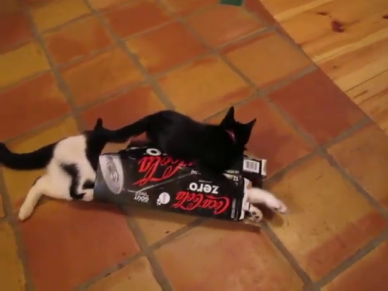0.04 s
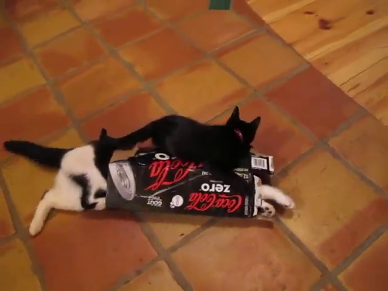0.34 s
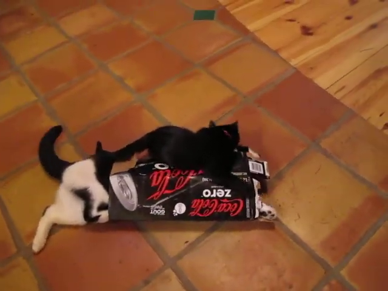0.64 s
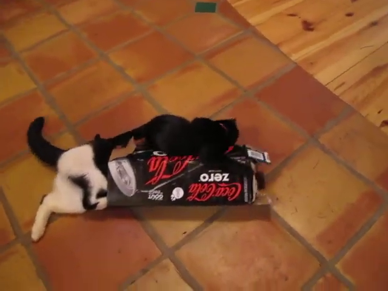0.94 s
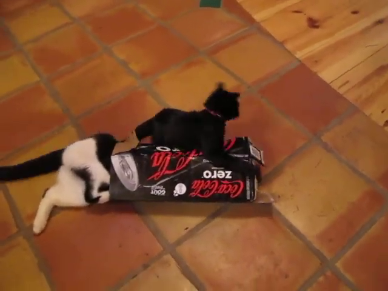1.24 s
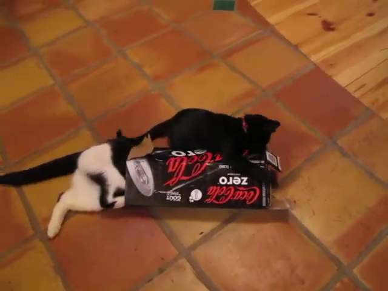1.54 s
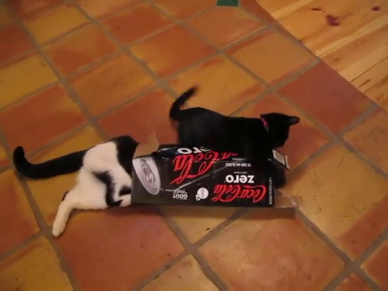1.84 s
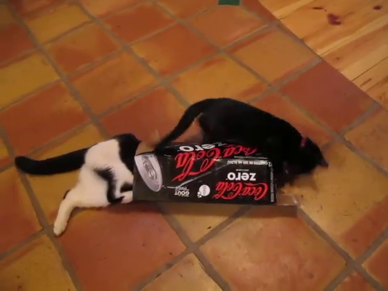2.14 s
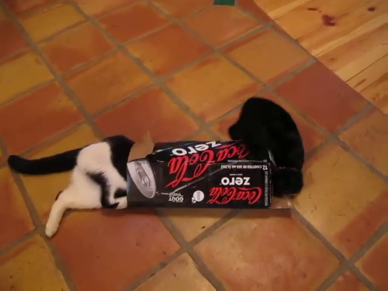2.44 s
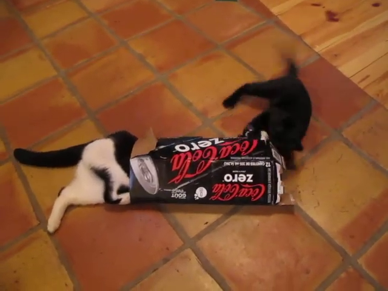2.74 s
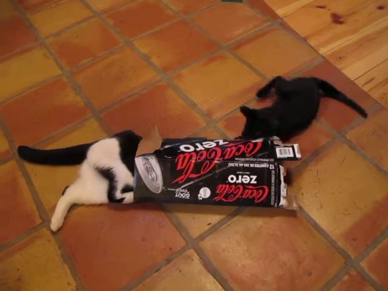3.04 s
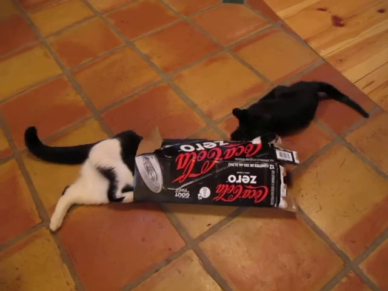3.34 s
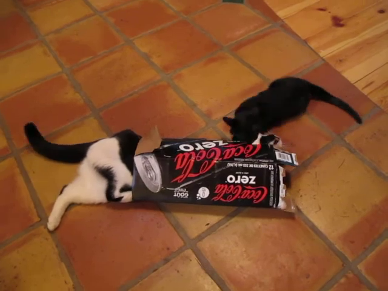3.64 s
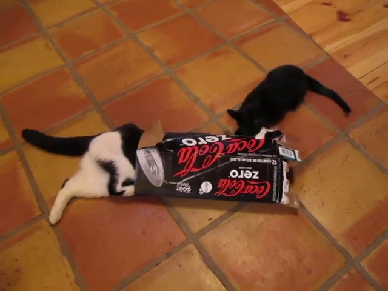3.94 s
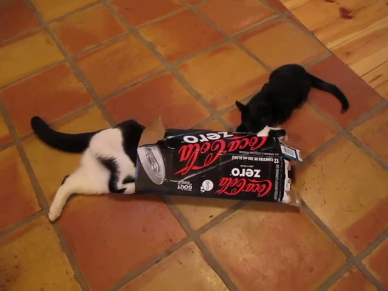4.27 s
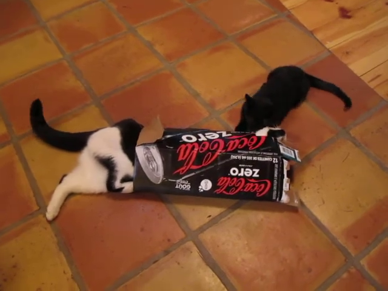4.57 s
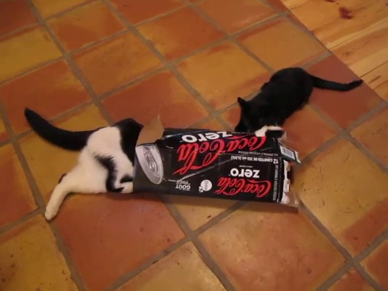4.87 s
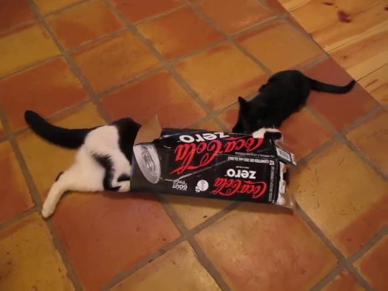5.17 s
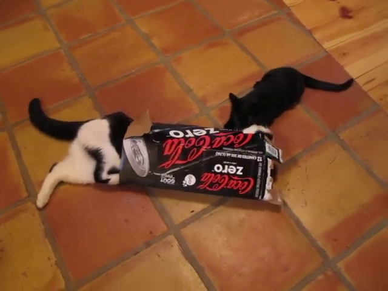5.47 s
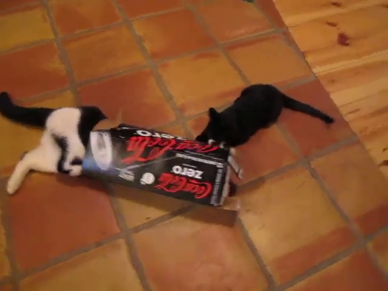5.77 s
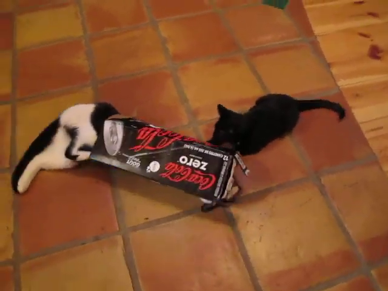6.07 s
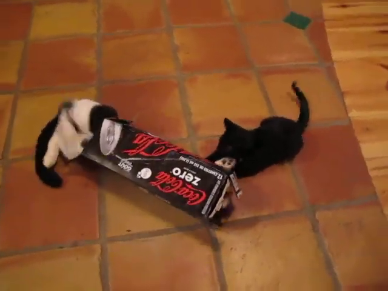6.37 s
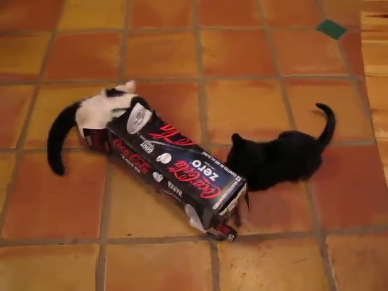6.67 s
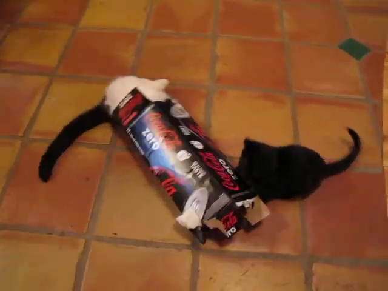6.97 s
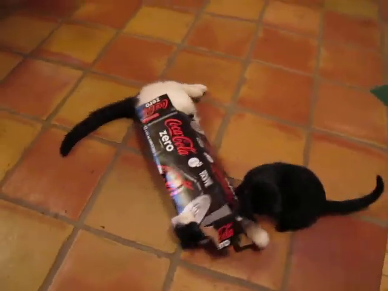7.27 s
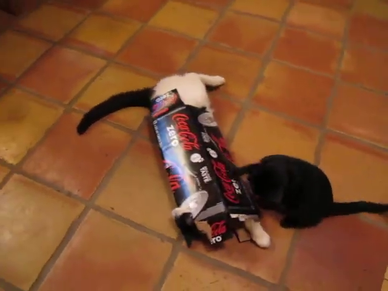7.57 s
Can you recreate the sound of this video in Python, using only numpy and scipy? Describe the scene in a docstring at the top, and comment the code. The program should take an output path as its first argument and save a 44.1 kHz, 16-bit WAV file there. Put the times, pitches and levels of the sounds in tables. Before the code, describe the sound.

Cats wrestle with a cardboard box on a tile floor, scraping, knocking and crinkling it, with one sharp slap over a low hum.

```python
"""Cats and a cardboard case

A cat wriggles inside a long cardboard case on a tile floor while a kitten pounces on it, in a
hard-walled room. Paws and edges knock the panels into ringing, creases snap, the end flap slaps, and
fur and card rub in tiny stick-slips. The squashed case puffs out air, a pellet tinkles faintly in the
kitten's collar bell, and a household appliance hums underneath."""
import sys
import numpy as np
from scipy import signal
from scipy.fft import rfft, irfft
from scipy.io import wavfile
from scipy.ndimage import uniform_filter1d

SR = 44100
rng = np.random.default_rng(int(sys.argv[2]) if len(sys.argv) > 2 else 0)


def master_out(mix):
    """Clip the mix to full scale and print it as 16-bit PCM to the path in sys.argv[1]."""
    frames = np.transpose(np.atleast_2d(mix))
    ceiling = np.clip(frames, -1, 1)
    pcm = np.round(ceiling * 32767).astype(np.int16)
    wavfile.write(sys.argv[1], SR, pcm)


N = 344421
T = np.arange(N) / SR
RING_T = T[:SR // 4]  # time axis of one struck sound

# decay of the room: f/Hz, t60/s
ROOM_DECAY = [(150, 0.34), (500, 0.61), (1200, 0.65), (3000, 0.6), (7000, 0.48), (14000, 0.55)]
# motor and mains tones of the appliance: f/Hz, rms level/dB
HUM_TONES = [(59.1, -50.5), (94.3, -50.5), (119.7, -53.5), (183, -56.5), (249.6, -50), (299.6, -59)]
# spectrum of the appliance's rush of air: f/Hz, level/dB
RUSH_SPECTRUM = [(20, 3.5), (48, -3), (75, -5.5), (135, -5.5), (175, -1.5), (270, -1.5), (330, -10),
                 (405, -5.5), (500, -16.5), (800, -20.5), (2000, -30.5), (5000, -36), (10500, -39),
                 (15500, -37)]
# collar bell modes: f/Hz, level/dB, t60/s
BELL_MODES = [(12270, 0, .12), (14520, -6, .12)]
# the pellet starts bouncing in the bell: t/s, level/dB
JINGLES = [(1.32, -44), (1.36, -40.5), (2.295, -41), (2.375, -32), (2.468, -37), (2.925, -42), (3.16, -44),
           (4.749, -39)]
# the squashed case puffs out air: t/s, peak level/dB
PUFFS = [(1.159, -36.5), (2.195, -32), (2.374, -28.5), (2.50, -39), (6.49, -33.5), (7.19, -37.5)]
# strokes of fur, paws and card over the case: crest t/s, length/s, hiss level/dB, rasp level/dB
STROKES = [(0.514, 0.13, -49, -54.5), (0.566, 0.43, -52.5, -66), (0.803, 0.9, -54, -47.5),
           (0.954, 0.58, -47.5, -46.5), (1.018, 0.21, -45, -49), (1.247, 0.21, -58, -50.5),
           (1.641, 0.14, -61, -44.5), (1.704, 0.39, -56, -55), (1.846, 0.33, -51.5, -50),
           (2.11, 0.23, -46, -48), (2.173, 0.24, -51, -42), (2.253, 0.24, -48, -46),
           (2.356, 0.14, -46.5, -37), (2.476, 0.44, -53.5, -56), (2.652, 0.42, -45.5, -39.5),
           (2.822, 0.73, -50.5, -45.5), (3.587, 0.37, -64, -56), (5.14, 0.38, -63, -63),
           (5.424, 0.069, -49.5, -49.5), (5.485, 0.28, -56.5, -51.5), (5.685, 0.47, -49, -47),
           (5.994, 0.66, -51.5, -47.5), (6.072, .16, -42, -42), (6.133, 0.6, -50.5, -52.5),
           (6.323, 0.11, -35.5, -42.5), (6.443, 0.36, -43.5, -47), (6.555, 0.22, -46, -43),
           (6.716, 0.45, -37, -40.5), (6.819, 0.32, -34, -37.5), (7.01, 0.63, -54, -46),
           (7.068, 0.22, -37.5, -57), (7.204, 0.037, -38, -37), (7.243, 0.16, -39.5, -41),
           (7.55, 0.17, -47, -58), (7.77, 0.26, -41.5, -40)]
# how hard rubbing drives the panel modes, most when the case drags over the tiles: t/s, level/dB
DRAG_DRIVE = [(1.0, -5.5), (2.25, 2.5), (2.65, -11), (5.5, -3), (5.93, 7.5), (6.2, 1.5), (6.85, 6.5),
              (7.3, -0.5), (7.8, -4.5)]
# spectrum of the card's surface hiss: f/Hz, level/dB
HISS_SPECTRUM = [(1200, -15), (2500, -1), (4500, -4), (7000, 1.5), (9800, 3.5), (15500, -9.5)]
# spectrum of the pressed panels' rasp: f/Hz, level/dB
RASP_SPECTRUM = [(150, -0.5), (300, -9.5), (480, 1.5), (850, -0.5), (1450, -0.5), (2100, -3), (3300, -5),
                 (5000, -8), (9000, -29)]
# creases snapping: t/s, level/dB, f/Hz
SNAPS = [(1.670, -18, 4300), (1.6708, -17, 7000), (2.168, -23.5, 7400), (2.348, -25, 4500),
         (2.551, -28.5, 10600), (5.438, -30, 8300), (6.074, -28, 8500), (6.136, -22.5, 8350),
         (6.4122, -22, 10000), (6.444, -26, 7000), (6.453, -20.5, 3520), (6.628, -12.5, 9900),
         (6.6317, -6.5, 10000), (6.636, -19.5, 3080), (6.643, -23, 10500), (6.699, -17, 9300),
         (6.789, -15, 8200), (7.0519, -8.5, 7240), (7.0598, -17, 7500), (7.1998, -20, 6170),
         (7.4153, -23.5, 9100), (7.526, -26, 8600), (7.536, -20, 11400), (7.758, -16.5, 7050),
         (7.7654, -19, 8500)]
# panel modes of the case: f/Hz, level/dB, t60/s
PANEL_MODES = [(188, 9, 0.012), (253, 9.5, 0.019), (345, 0, 0.063), (413, -5, 0.13), (510, 5, 0.038),
               (576, -2, 0.065), (726, 10, 0.022), (900, 0.5, 0.014), (1124, 0.5, 0.029), (1175, 14, 0.01),
               (1390, 1, 0.054), (1660, 3, 0.021), (1910, 8.5, 0.006), (2300, 5.5, 0.02),
               (2300, -11.5, 0.0042), (3140, 1, 0.03)]
# blows on the case, pitched lower the softer the contact: t/s, level/dB, f/Hz
KNOCKS = [(1.3119, -19, 505), (1.334, -23, 233), (1.671, -31, 422), (1.9514, -31.5, 760),
          (2.0452, -34.5, 640), (2.126, -29, 610), (2.150, -33, 400), (2.165, -29, 1020),
          (2.2235, -18, 730), (2.260, -26.5, 554), (2.274, -25, 497), (2.357, -29.5, 1170),
          (2.365, -25.5, 472), (4.7493, -34, 1800), (4.7688, -38.5, 1700), (4.8004, -41.5, 1800),
          (5.4085, -39, 980), (5.727, -21.5, 564), (5.8526, -24.5, 352), (6.067, -30, 630),
          (6.454, -30, 2610), (7.206, -31.5, 640), (7.311, -32, 1690), (7.755, -29.5, 1920)]
# spectrum of a hard contact's click: f/Hz, level/dB
CLICK_SPECTRUM = [(60, -40), (400, -44), (1500, 5), (3000, 22), (7000, 8.5), (15500, 9)]
# the end flap, let go by the leaping kitten, slaps the case and chatters: t/s, peak level/dB
SLAPS = [(2.8726, -6.5), (2.8738, -4), (2.877, -8.5)]
# spectrum of the flap's slap: f/Hz, level/dB
FLAP_SPECTRUM = [(180, -45), (300, -15), (383, -18), (490, -2), (975, -7.5), (1230, -1), (1760, -10.5),
                 (9330, -24.5), (13600, -33.5), (15000, -32.5)]
# treble roll-off over the whole mix: f/Hz, level/dB
TREBLE_EQ = [(6000, 0.5), (11000, 0.5), (12500, -5.5), (15500, -12)]


def undb(db):
    """Decibels to gain."""
    return 10 ** (np.asarray(db) / 20)


def unit(x):
    """Scale to rms 1."""
    return x / np.sqrt(np.mean(x ** 2))


def peak(x):
    """Scale to peak 1."""
    return x / np.abs(x).max()


def add(out, s, x):
    """Mix x into out from second s on."""
    i = max(0, int(s * SR))
    out[i:i + len(x)] += x[:max(0, N - i)]


def convolve(x, impulse):
    """Pass x through an impulse response."""
    return signal.oaconvolve(x, impulse)[:N]


def lookup(points, hz):
    """Read (f/Hz, value) points on a log-frequency axis."""
    f, value = np.transpose(points)
    return np.interp(np.log(hz + 1), np.log(f), value)


def response(spectrum, size=4096):
    """Minimum-phase impulse response with the given spectrum."""
    gain = undb(lookup(spectrum, np.arange(size // 2 + 1) * SR / size))
    cepstrum = irfft(np.log(gain))
    cepstrum[1:size // 2] *= 2
    cepstrum[size // 2 + 1:] = 0
    return irfft(np.exp(rfft(cepstrum)))


def wander(rate_hz):
    """Smooth random drift with rms 1."""
    hold = int(SR / rate_hz)
    steps = np.repeat(rng.standard_normal(N // hold + 1), hold)[:N]
    return unit(uniform_filter1d(uniform_filter1d(steps, hold), hold))


def decay(t60, t=RING_T):
    """Envelope that falls 60 dB in t60 seconds."""
    return np.exp(-np.log(1000) * t / t60)


def ring(hz, t60):
    """A struck mode."""
    return np.sin(2 * np.pi * hz * RING_T) * decay(t60)


def room(x, wet_db, build_s=0.0014):
    """Tiles and walls add a dense tail that builds up quickly and lingers longest in the mids."""
    t, hz = T[:SR], np.arange(SR // 2 + 1)
    noise = rfft(rng.standard_normal(SR))
    centres, t60s = np.transpose(ROOM_DECAY)
    tail = np.zeros(SR)
    for share, t60 in zip(np.eye(len(centres)), t60s):
        band = lookup(np.column_stack([centres, share]), hz)
        tail += irfft(noise * band, SR) * decay(t60, t)
    tail *= 1 - np.exp(-(t / build_s) ** 2)
    return x + undb(wet_db) * convolve(x, tail / np.linalg.norm(tail))


def appliance(waver_db=0.06, rush_db=-45.5):
    """The bed: motor and mains tones that waver a little, over a steady rush of air."""
    hum = np.zeros(N)
    for hz, db in HUM_TONES:
        amplitude = np.sqrt(2) * undb(db + waver_db * wander(rate_hz=4))
        hum += amplitude * np.sin(2 * np.pi * (hz * T + rng.random()))
    colour = undb(lookup(RUSH_SPECTRUM, np.arange(N // 2 + 1) * SR / N))
    rush = unit(irfft(rfft(rng.standard_normal(N)) * colour, N))
    return hum + undb(rush_db) * rush


def collar_bell(bounce_s=0.022, fade_db=4.0, first_db=-6, bounces=8):
    """A pellet bounces in a tiny bell, ever more weakly; each touch rings a new blend of the modes."""
    out = np.zeros(N)
    for s, db in JINGLES:
        for k in range(bounces):
            touch = sum(undb(mode_db) * rng.uniform(0.55, 1) * ring(hz, t60)
                        for hz, mode_db, t60 in BELL_MODES)
            add(out, s, undb(db + first_db - k * fade_db) * touch)
            s += rng.exponential(bounce_s)
    return out


def puffs(hz=31, t60=0.21, attack_s=0.016):
    """Squashing the case pushes out a deep, quickly damped wave of air."""
    out = np.zeros(N)
    puff = peak(ring(hz, t60) * (1 - np.exp(-RING_T / attack_s)))
    for s, db in PUFFS:
        add(out, s, undb(db) * puff)
    return out


def stroke_envelopes(swell_share=0.39, depth_db=21.5, fidget_hiss_db=-72, fidget_rasp_db=-68):
    """Hiss and rasp swell quickly and fade more slowly with each stroke; the cats never keep still."""
    hiss_power = np.full(N, undb(fidget_hiss_db) ** 2)
    rasp_power = np.full(N, undb(fidget_rasp_db) ** 2)
    for s, length_s, hiss_db, rasp_db in STROKES:
        near = np.abs(T - s) < 2 * length_s
        offset = (T[near] - s) / length_s
        away = np.maximum(-offset / swell_share, offset / (1 - swell_share))  # 0 at crest, 1 at ends
        swell = undb(-depth_db * away)
        hiss_power[near] += (undb(hiss_db) * swell) ** 2
        rasp_power[near] += (undb(rasp_db) * swell) ** 2
    return np.sqrt(hiss_power), np.sqrt(rasp_power)


def slips(per_s, spread_db=3.0):
    """Tiny stick-slip releases at random times, a few much larger than the rest."""
    size = undb(spread_db * np.minimum(rng.exponential(size=N), 5))
    released = rng.random(N) < per_s / SR
    return unit(released * size * rng.choice([-1, 1], N))


def rubbed_panels(force, t60_scale=0.33):
    """A travelling contact drives the modes by turns; card pressed on the tiles rings more briefly."""
    return unit(sum(undb(db) * wander(rate_hz=35) * convolve(force, ring(hz, t60 * t60_scale))
                    for hz, db, t60 in PANEL_MODES))


def scrape(hiss_db=-2, rasp_db=-4, hiss_jerk_db=2.0, rasp_jerk_db=0.5):
    """Jerky rubbing: fine slips hiss on the card's surface, coarser ones rasp through the panels."""
    hiss_envelope, rasp_envelope = stroke_envelopes()
    drag_db = np.interp(T, *np.transpose(DRAG_DRIVE))
    jerk = wander(rate_hz=100)
    hiss = unit(convolve(slips(per_s=7000), response(HISS_SPECTRUM)))
    coarse = unit(convolve(slips(per_s=2800), response(RASP_SPECTRUM)))
    rasp = coarse + undb(drag_db) * rubbed_panels(coarse)
    return (hiss * hiss_envelope * undb(hiss_db + hiss_jerk_db * jerk)
            + rasp * rasp_envelope * undb(rasp_db + rasp_jerk_db * jerk))


def crease_snaps(step_s=0.00015, fade_db=6, steps=3, tight_hz=9700):
    """A crease gives way in quick steps, each a tiny burst; tight, high creases ring for more cycles."""
    out = np.zeros(N)
    for s, db, hz in SNAPS:
        cycles = 0.47 * (1 + (hz / tight_hz) ** 6)
        age = RING_T * hz / cycles
        burst = peak(age * np.exp(-1.4 * age) * np.sin(2 * np.pi * hz * RING_T))
        for k in range(steps):
            add(out, s, undb(db - k * fade_db) * burst)
            s += rng.uniform(0.6, 2.5) * step_s
    return out


def blow(pitch_hz, detune=0.049):
    """One hit rings the panel modes, favouring those near a pitch set by the softness of the contact."""
    mode_hz, mode_db, t60s = np.transpose(PANEL_MODES)
    bend, landing = rng.standard_normal((2, len(mode_hz)))
    ratio = mode_hz / pitch_hz
    # where the blow lands decides whether a mode starts inwards or outwards
    drive = np.sign(landing) * undb(mode_db) * ratio / (1 + ratio ** 4)
    # the cats' weight bends the panels, so the modes shift from blow to blow
    bent_hz = mode_hz * (1 + detune * bend)
    body = sum(gain * ring(hz, t60) for gain, hz, t60 in zip(drive, bent_hz, t60s))
    contact_pulse = np.hanning(int(0.5 * SR / pitch_hz))
    velocity = np.convolve(body, contact_pulse)
    # the air follows the panels' acceleration, so a blow carries no deep bass
    return peak(np.diff(velocity))


def knocks(hard_hz=760, click_db=6.5, rebound_s=0.00356, rebound_db=-5, rebound_ratio=0.67):
    """Paws and edges hit the case, which rebounds more dully on the tile; hard contact adds a click."""
    out = np.zeros(N)
    click = peak(response(CLICK_SPECTRUM))
    for s, db, pitch_hz in KNOCKS:
        hardness = 1 / (1 + (hard_hz / pitch_hz) ** 8)
        add(out, s, undb(db) * blow(pitch_hz))
        add(out, s, undb(db + click_db) * hardness * click)
        add(out, s + rebound_s, undb(db + rebound_db) * blow(pitch_hz * rebound_ratio))
    return out


def flap_slaps(rattle_db=-27, rattle_t60=0.042):
    """The flap lands flat with a crack and its edge rattles; each contact gets its own room tail."""
    out = np.zeros(N)
    for s, db in SLAPS:
        force = undb(rattle_db) * rng.standard_normal(len(RING_T)) * decay(rattle_t60)
        force[0] = 1  # the crack
        contact = np.zeros(N)
        add(contact, s, undb(db) * peak(convolve(force, response(FLAP_SPECTRUM))))
        out += room(contact, wet_db=-5.5)
    return out


def scene():
    """Case and bell sound into the room, each part from its own place, over the hum."""
    hits = room(knocks(), wet_db=-4.5) + flap_slaps()
    wriggling = room(crease_snaps(), wet_db=-3.5) + room(scrape(), wet_db=-6.5) + puffs()
    tinkle = room(collar_bell(), wet_db=-15)
    return (hits + wriggling + tinkle + appliance())[None]


def record(dry, top_hz=15900):
    """Master EQ: the top of the treble is dulled, then cut off steeply."""
    dulled = convolve(dry[0], response(TREBLE_EQ))
    lowpass = signal.ellip(8, 0.2, 70, top_hz, fs=SR, output="sos")
    return signal.sosfilt(lowpass, dulled)[None]


dry = scene()
out = record(dry)
master_out(out)
```